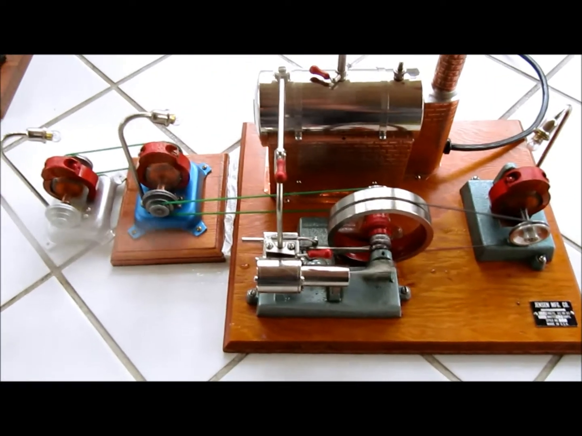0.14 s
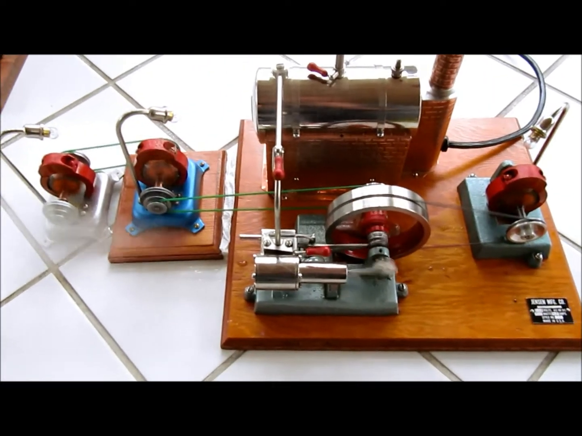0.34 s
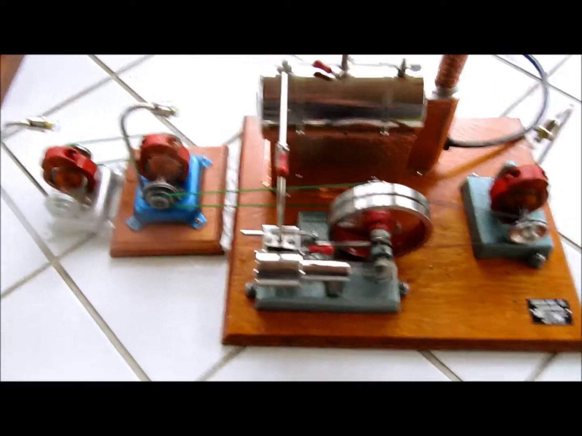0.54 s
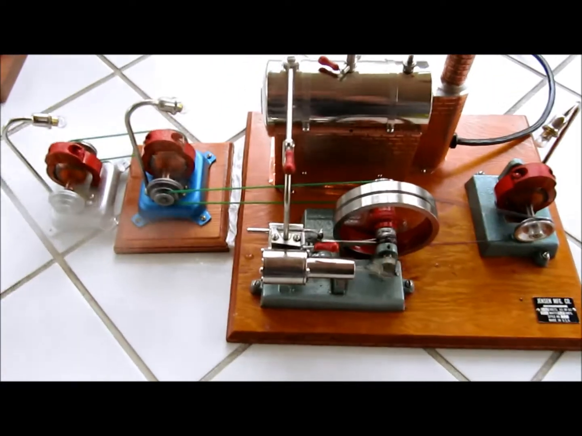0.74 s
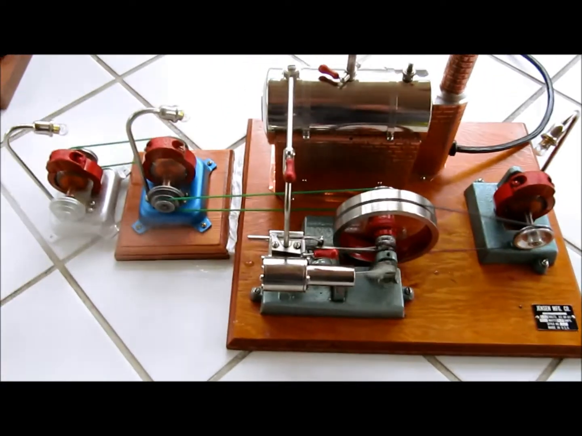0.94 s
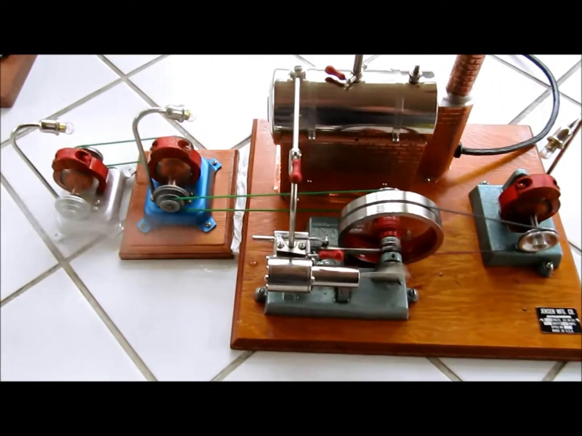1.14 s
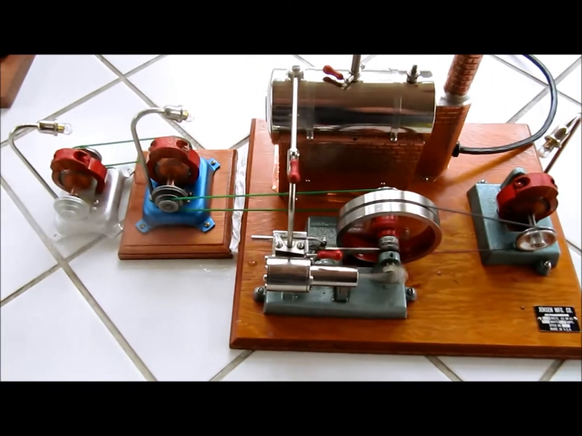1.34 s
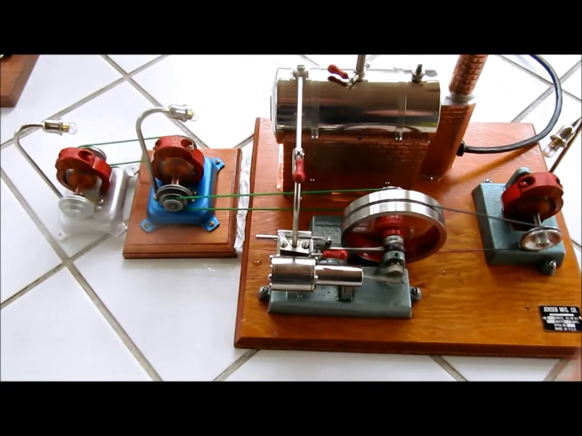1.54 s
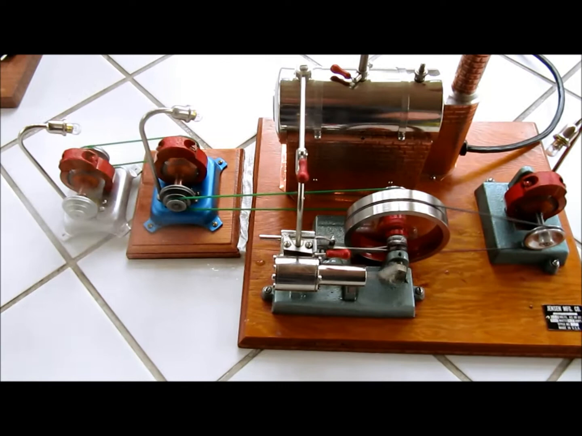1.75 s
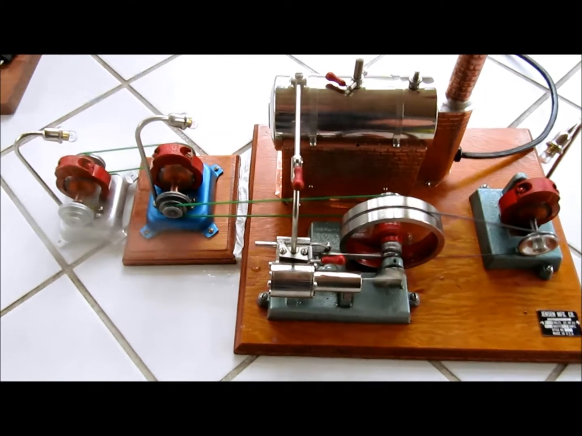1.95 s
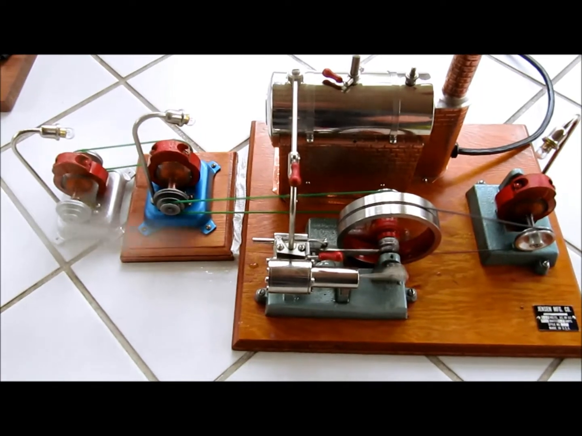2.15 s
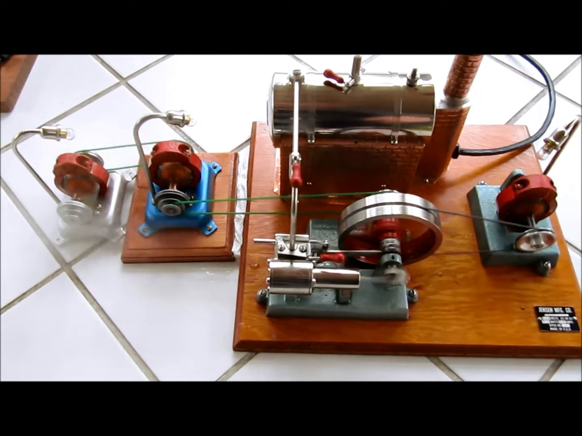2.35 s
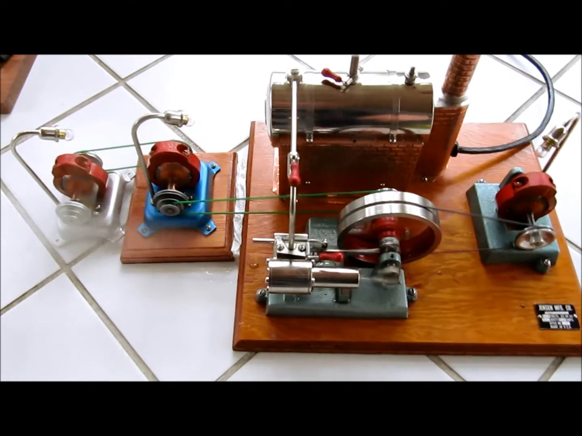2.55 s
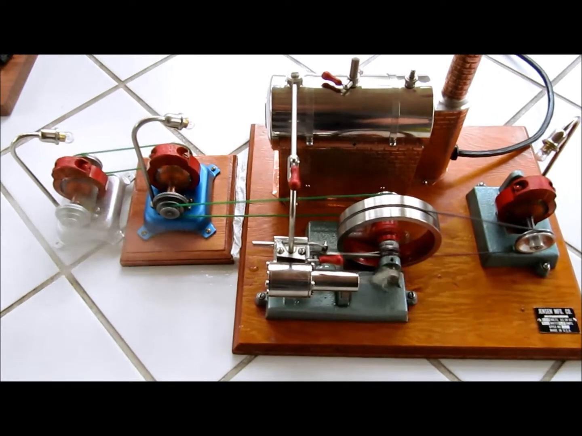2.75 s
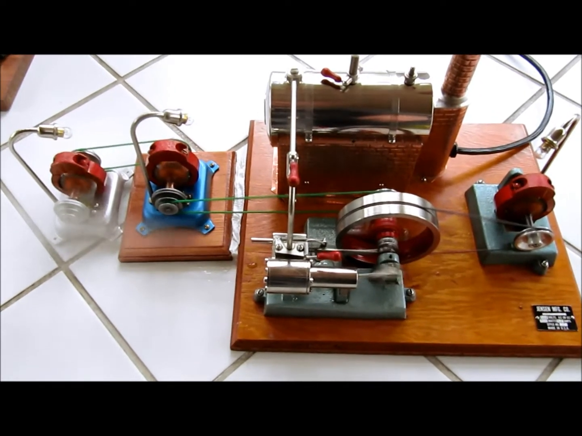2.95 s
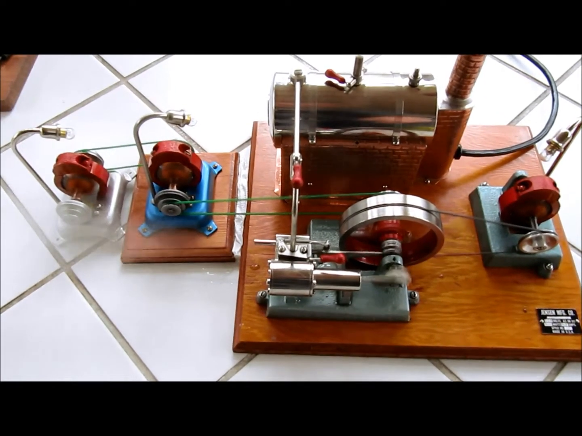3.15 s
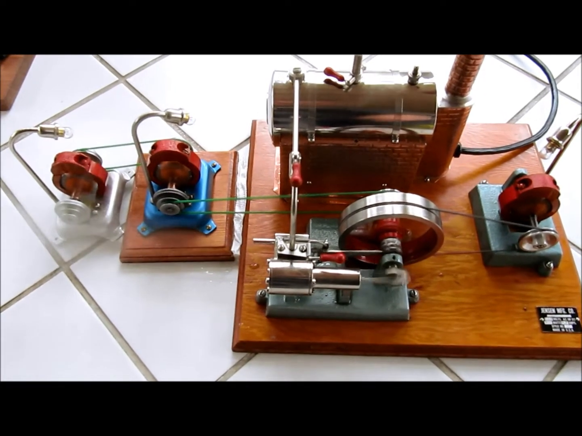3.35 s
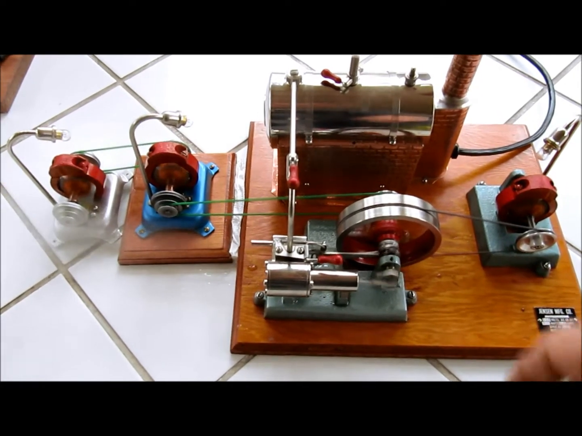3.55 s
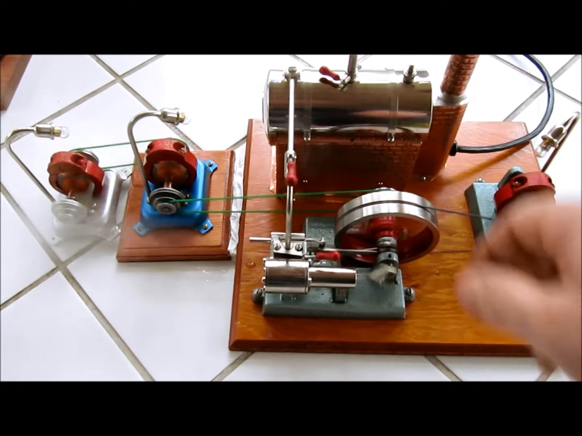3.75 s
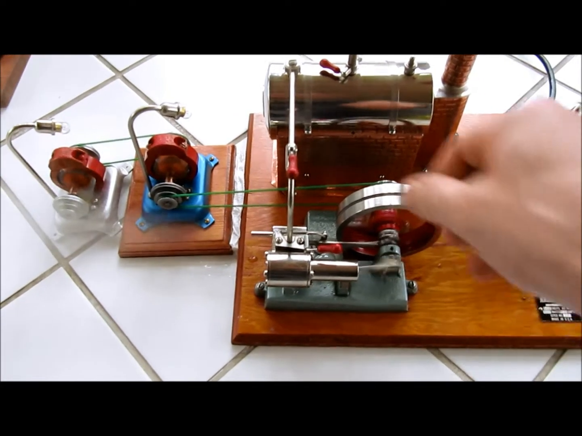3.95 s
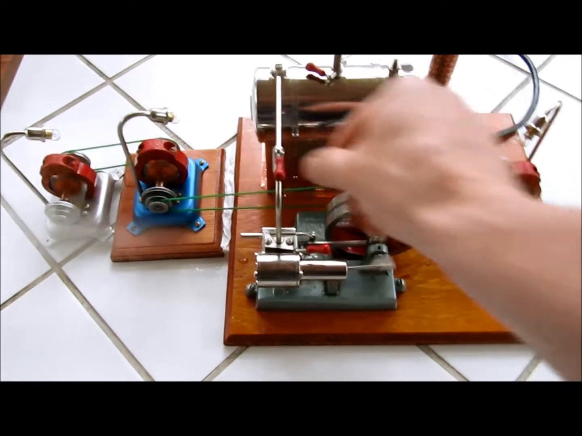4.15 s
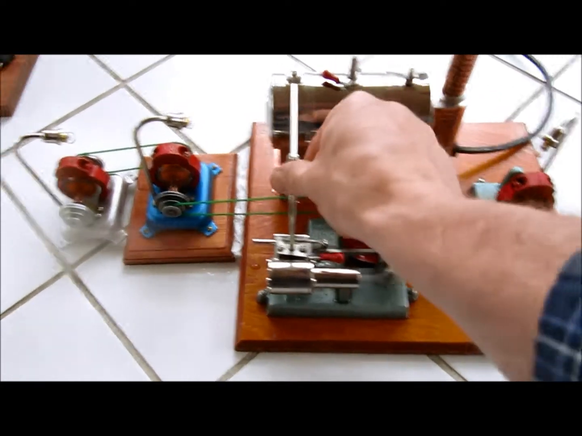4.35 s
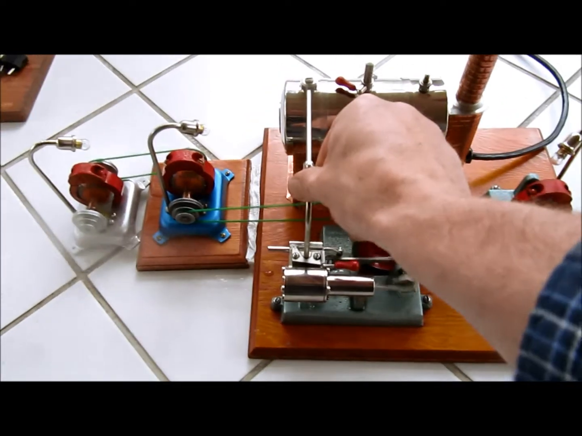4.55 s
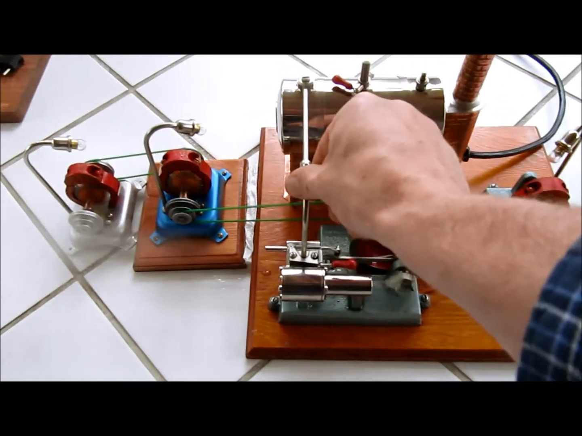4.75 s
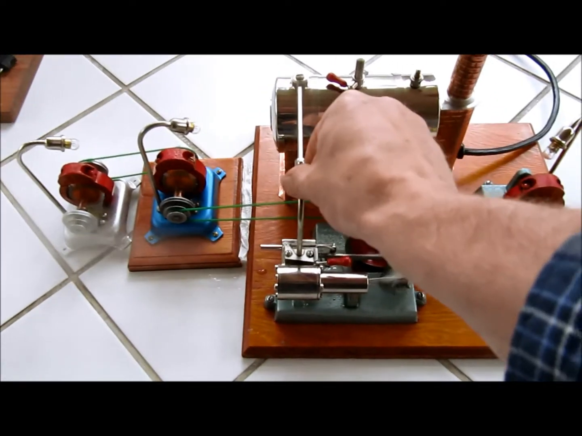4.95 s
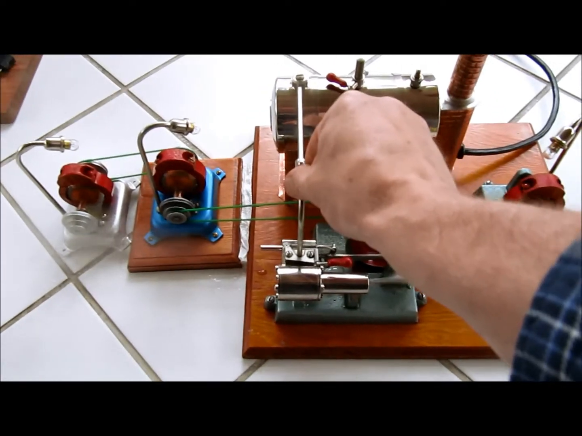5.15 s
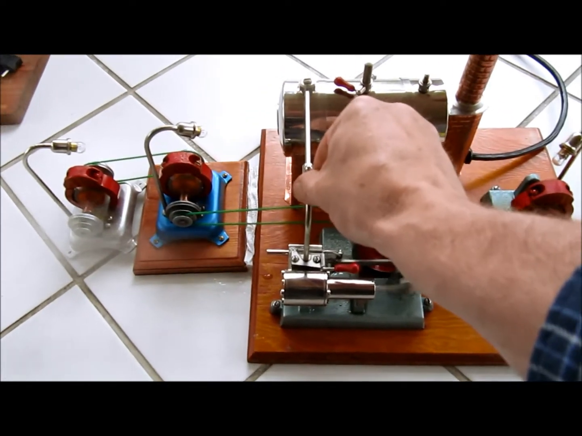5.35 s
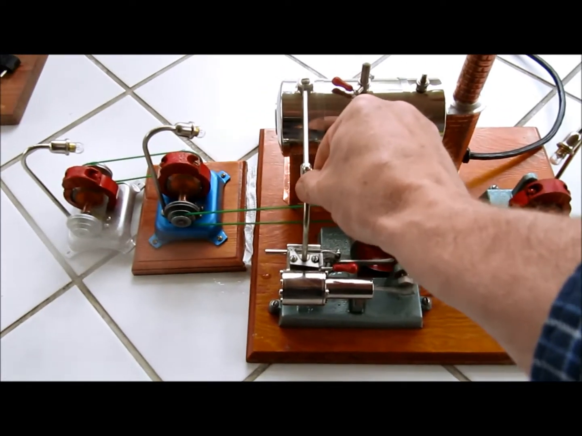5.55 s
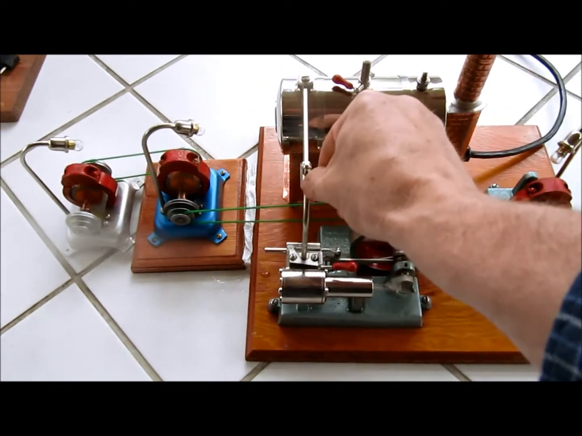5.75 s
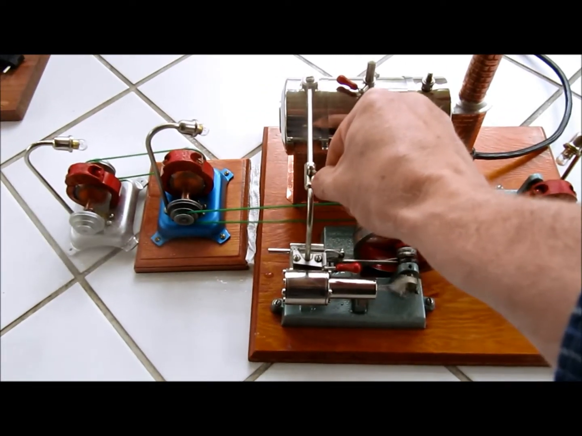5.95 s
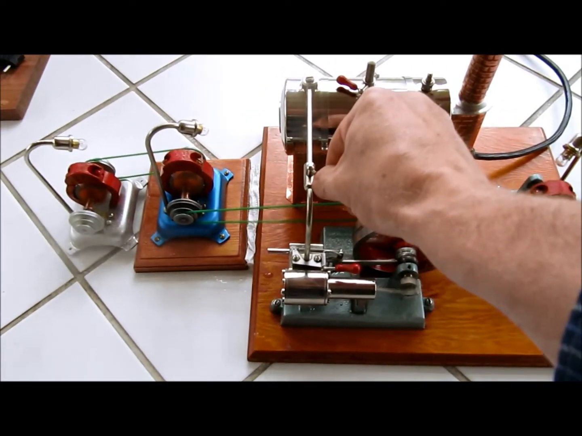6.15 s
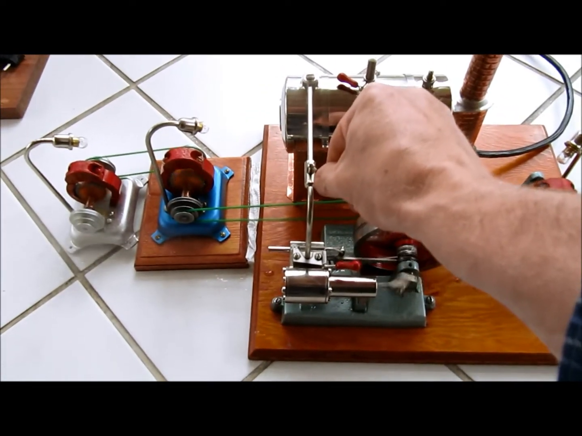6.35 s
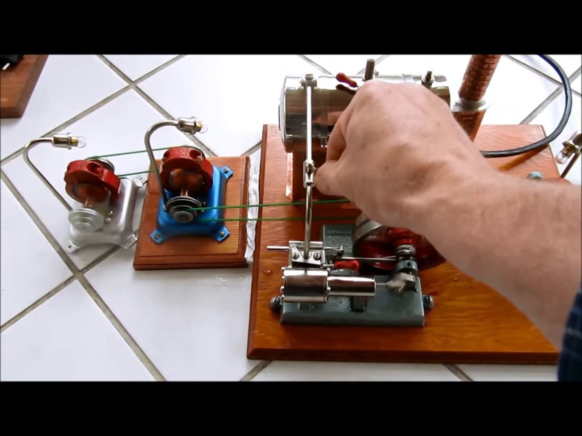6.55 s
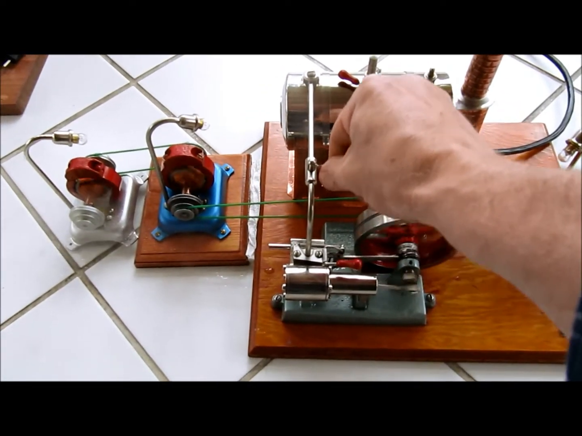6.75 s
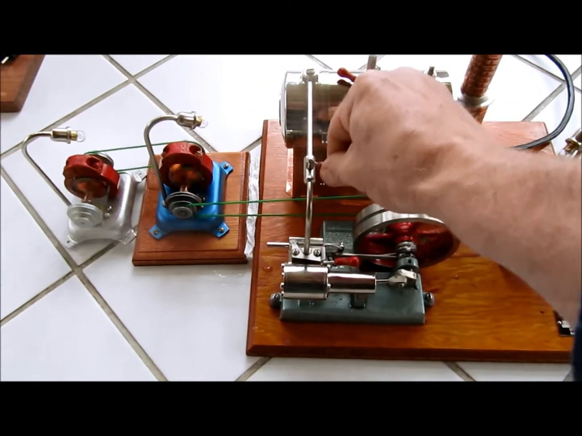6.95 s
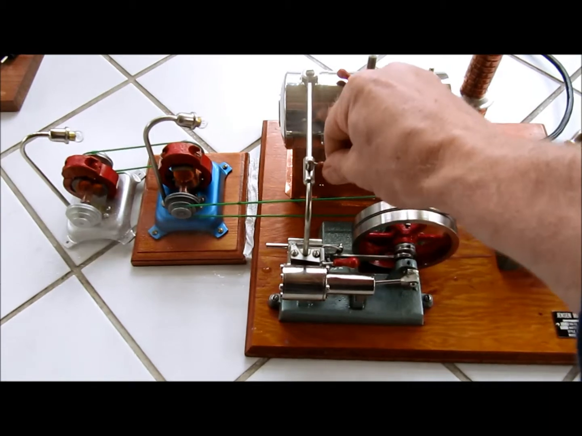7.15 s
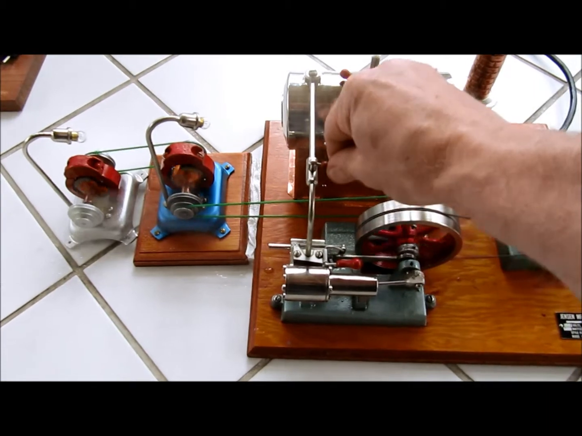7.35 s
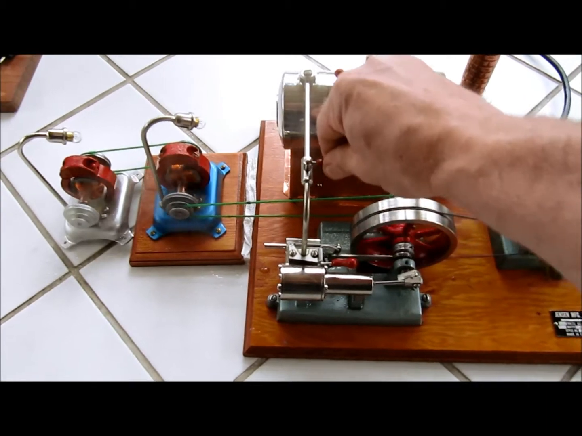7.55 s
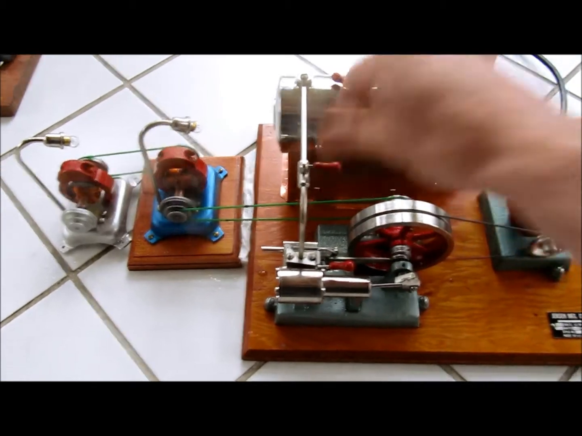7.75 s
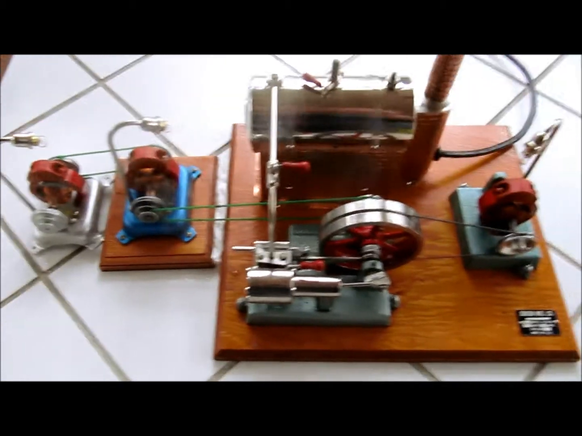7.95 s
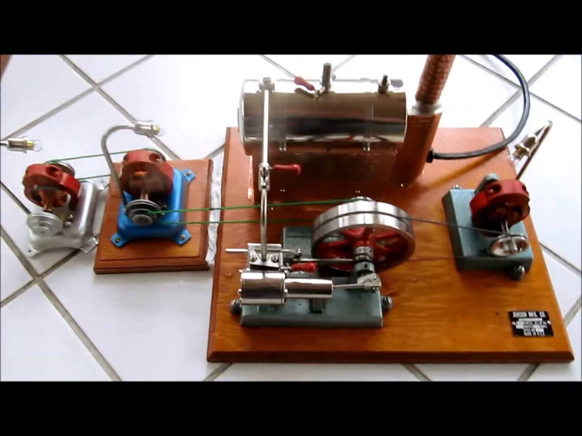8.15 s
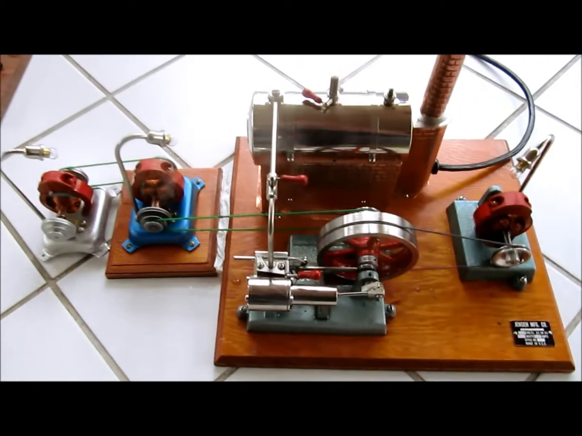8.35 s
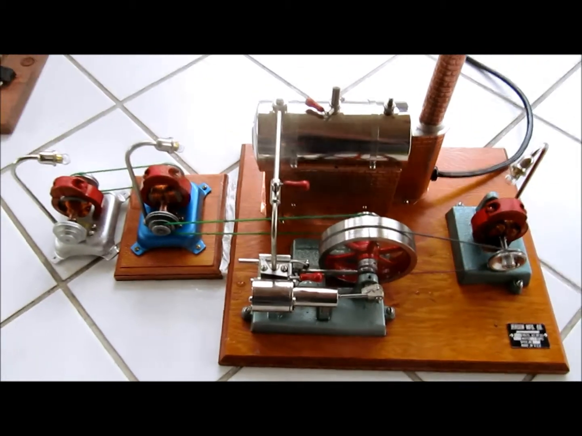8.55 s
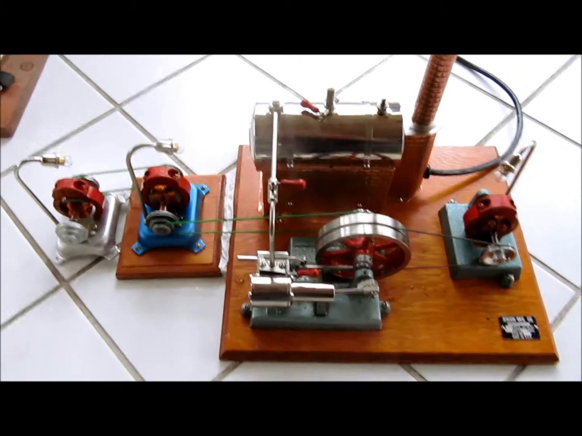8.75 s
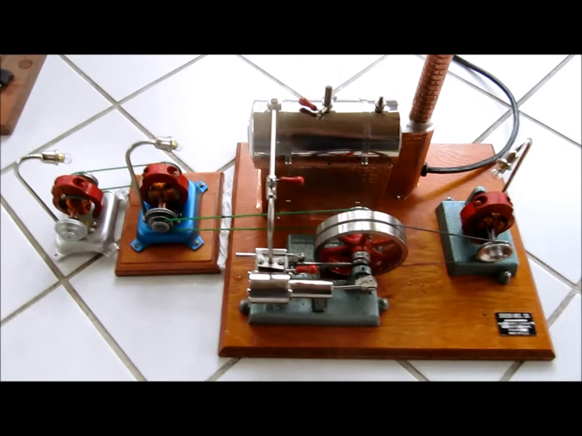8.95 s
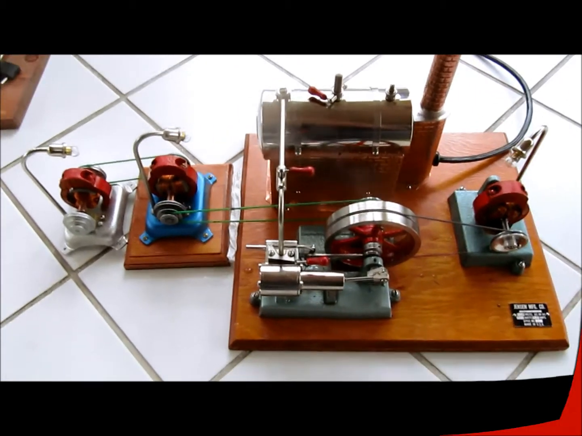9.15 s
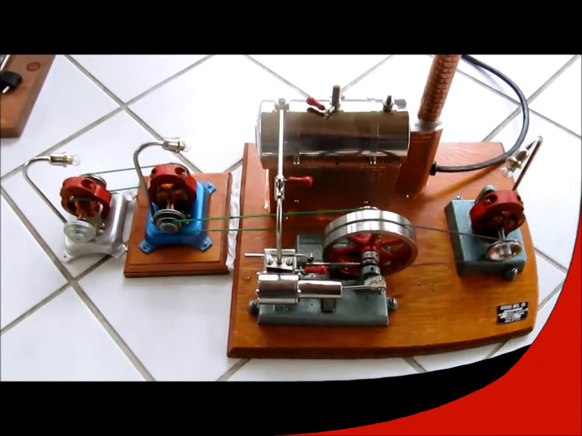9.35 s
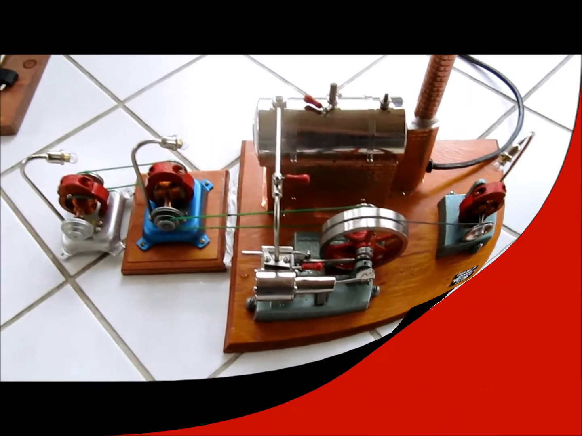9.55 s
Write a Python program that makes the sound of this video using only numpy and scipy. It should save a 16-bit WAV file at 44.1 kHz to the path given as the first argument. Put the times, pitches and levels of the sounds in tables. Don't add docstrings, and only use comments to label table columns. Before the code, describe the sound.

Close handheld pickup of a toy steam engine over a tiled floor: a rapid fluttering hiss, metallic and high, with dry knocking through its wooden base and whirring generators. A hand closing in makes the hiss slightly hollow. The valve shuts, puffs spread out and die, a small squeak and knock follow, then a thin steam seep with brief spurts, room noise, low bumps and loud camera-housing ticks.

```python
import sys
import numpy as np
from scipy import signal
from scipy.fft import rfft, irfft, next_fast_len
from scipy.io import wavfile
from scipy.ndimage import uniform_filter1d, map_coordinates

SR = 44100
rng = np.random.default_rng(int(sys.argv[2]) if len(sys.argv) > 2 else 0)


def dump(signal):
    limited = np.clip(np.atleast_2d(signal).T, -1, 1)
    pcm = np.round(limited * 32767).astype(np.int16)
    wavfile.write(sys.argv[1], SR, pcm)


def level_to_linear(level):
    exponent = np.asarray(level, float) / 20
    return 10 ** exponent


N = 427326
TIME_S = np.arange(N) / SR

STROKES = [(-.03, .31), (.44, .86)]
# shut/dB, peak/dB, after blow-down/dB, push-out end/dB
FRAME_JET = [(-10, -2.9, -0.5, -5), (-8.5, -2.5, -4, -7)]
FRAME_LAG = (0.084, 3.8, 0)
KICK_TURNS = 0.066
FULL_SPEED = 11
FRAME_DB = -37
HAND_START_S, HAND_THERE_S = 3.5, 4.3


def unit(x):
    return x / np.sqrt(np.mean(x ** 2) + 1e-20)


def curves(rows, at=None):
    s, *cols = np.transpose(rows)
    return [np.interp(TIME_S if at is None else at, s, c) for c in cols]


def ramp(start_s, end_s):
    return np.clip((TIME_S - start_s) / (end_s - start_s), 0, 1)


def wobble(rate_hz):
    coarse = np.arange(0, N + 8, 8)
    knots = rng.standard_normal(int(N * rate_hz / SR) + 4)
    return np.interp(np.arange(N), coarse, map_coordinates(knots, [coarse * rate_hz / SR]))


def filtered(x, response):
    m = next_fast_len(N + SR // 2)
    return irfft(rfft(x, m) * response(np.fft.rfftfreq(m, 1 / SR)), m)[:N]


def hiss(spectrum, patchy_db):
    z = signal.stft(rng.standard_normal(N + 512), nperseg=256)[2]
    field = uniform_filter1d(rng.standard_normal(z.shape), size=4, axis=0)
    field = uniform_filter1d(field, size=12, axis=1)
    patchy = signal.istft(z * level_to_linear(patchy_db * unit(field)), nperseg=256)[1][:N]
    f, db = np.transpose(spectrum)
    return unit(filtered(patchy, lambda hz: level_to_linear(np.interp(np.log(hz + 1), np.log(f + 1), db))))


def ring(hz, t60_s, t):
    return level_to_linear(-60 * t / t60_s) * np.sin(2 * np.pi * hz * t)


def crank_speed():
    # t/s, speed/(turns/s)
    speed_rows = [
        (0, 11.162),
        (3.5, 10.973),
        (5.72, 10.953),
        (5.95, 10.261),
        (6.55, 4.515),
        (7.1, .682),
        (7.4, 0),
    ]
    return curves(speed_rows)[0]


def port(turns, jet, lag):
    crack_turns, blow_turns, shut_turns = 0.031, 0.081, 0.072
    rise_turns, under_db, kick_db = lag
    knots = []
    for (opens, shuts), (shut, peak, blown, end), after in zip(STROKES, jet, jet[::-1]):
        peak_at = opens + rise_turns
        knots += [(opens, shut), (opens + crack_turns, peak - under_db), (peak_at, peak)]
        knots += [(peak_at + blow_turns, blown), (shuts - KICK_TURNS, end)]
        knots += [(shuts, end + kick_db), (shuts + shut_turns, after[0] + 2)]
    return np.interp(turns, *np.transpose(knots), period=1)


def vibration(level_db, slows):
    settle_db, settle_s, sag_db_per_s = 3, 0.31, 0.3553
    jolt_s, jolt_db, jolt_t60_s = 6.805, -47, 0.73
    steady_db = level_db + settle_db * np.exp(-TIME_S / settle_s) - sag_db_per_s * TIME_S
    steady = level_to_linear(steady_db) * (crank_speed() / FULL_SPEED) ** slows
    lurch_db = jolt_db + level_db - FRAME_DB + 4.5 - 60 * np.abs(TIME_S - jolt_s) / jolt_t60_s
    return np.hypot(steady, level_to_linear(lurch_db) * (TIME_S > jolt_s))


def echo(x, delay_ms):
    return map_coordinates(x, [np.arange(N) - delay_ms * SR / 1000])


def surroundings(x):
    # delay/ms, level/dB
    tiles = [
        (1.3, -11),
        (2.3, -12),
    ]
    hand_db, far_ms, near_ms = -10, .76, .58
    close = ramp(HAND_START_S, HAND_THERE_S)
    near = sum(level_to_linear(db) * echo(x, ms + 0.089 * wobble(0.816)) for ms, db in tiles)
    hand = level_to_linear(hand_db) * close * echo(x, far_ms + (near_ms - far_ms) * close)
    return level_to_linear(-1.0) * (x + near + hand)


def boiler_hiss(gain_db):
    # f/Hz, level/dB
    boiler = [(2500, -36), (4000, -43), (5500, -18.5), (7000, -9.5), (8500, -6.5), (9500, -3.5),
              (11000, -7), (12400, -11.5), (13000, -18), (15700, -22)]
    # t/s, length/s, level/dB
    spurt_rows = [
        (8.19, .02, -42),
        (9.045, .012, -52),
        (9.168, 0.095, -45),
        (9.587, 0.078, -36),
    ]
    boiler_db, supply_db, supply_ends_s, supply_db_per_s = -50, -44.5, 6, 27.5
    spurts = np.zeros(N)
    for s, length_s, db in spurt_rows:
        edges = np.minimum((TIME_S - s) / 0.0054, (s + length_s - TIME_S) / 0.014 + 1)
        spurts += level_to_linear(db) * np.clip(edges, 0, 1)
    supply = level_to_linear(supply_db - supply_db_per_s * np.maximum(TIME_S - supply_ends_s, 0))
    steady = np.hypot(level_to_linear(boiler_db + gain_db), supply)
    return np.hypot(steady * level_to_linear(.3 * wobble(12)), spurts) * hiss(boiler, patchy_db=.4)


def hand_rumble(lumpy):
    # f/Hz, level/dB
    rumble = [(8, -13), (20, -1), (50, -18), (75, -17), (100, -29), (200, -58)]
    # t/s, level/dB
    grip_rows = [(7.28, -59), (7.55, -69), (7.85, -53), (7.97, -57), (8.2, -54), (8.4, -60), (8.56, -50),
                 (8.69, -45), (8.92, -53), (9.05, -48), (9.14, -56), (9.2, -53), (9.28, -52), (9.46, -50.5),
                 (9.63, -58)]
    shaken_db, still_db, grip_rise_s = -62, -73, 0.038
    grips = np.zeros(N)
    for s, db in grip_rows:
        u = np.maximum(TIME_S - s, 0) / grip_rise_s + 1e-9
        grips += level_to_linear(db) * u * np.exp(1 - u)
    floor = level_to_linear(shaken_db) * (crank_speed() / FULL_SPEED) ** 2 + level_to_linear(still_db)
    return np.hypot(floor, grips) * level_to_linear(1.6 * lumpy * wobble(16)) * hiss(rumble, patchy_db=1.5)


def background():
    # t/s, gain/dB
    gain_rows = [(0, -15), (6, 5.5), (6.4, 2), (7, 1), (7.6, 1.5), (8.2, 5), (9, 6.5), (9.65, 10)]
    # f/Hz, level/dB
    room = [(53, -20), (90, -4), (430, -8), (461, -3), (531, -5), (781, -3), (1090, -6), (1470, -3.5),
            (2020, -6.5), (2200, -4.5), (2490, -5), (6000, -6), (7800, -13), (13200, -120)]
    room_db = -54
    gain_db = curves(gain_rows)[0]
    lumpy = ramp(6.7, 8.6)
    drive = hiss([(2050, -51), (2130, -5), (2180, -2), (2260, -49)], patchy_db=0.0)
    whine = level_to_linear(-13.0) * lumpy * drive
    air = level_to_linear(room_db + gain_db) * (hiss(room, patchy_db=1.35) + whine)
    return boiler_hiss(gain_db) + air + hand_rumble(lumpy)


def housing():
    # t/s, snap/dB, ring f/Hz, ring/dB, thud/dB
    ticks = [(6.455, -31, 2260, -35, -57), (6.6603, -33, 2290, -38, -38), (6.8036, -27, 2220, -33, -29.5),
             (8.578, -18, 2160, -27, -39), (8.5898, -8, 2580, -43, -24.5), (8.683, -30, 2380, -26, -50),
             (8.6894, -7.5, 4060, -16, -33), (9.0632, -17, 4560, -20, -28), (9.065, -29, 2240, -20.5, -51),
             (9.2198, -36, 3020, -45, -42), (9.239, -28, 2230, -33, -55), (9.377, -16, 1140, -26, -17.5),
             (9.507, -24, 4450, -36, -50), (9.671, -18.5, 895, -29, -40)]
    # f/Hz, level/dB
    snap_modes = [(1000, -11), (1600, -9), (2500, 5), (3500, 4.5), (4400, 7), (5400, -3), (6500, -4),
                  (8000, -6), (9700, 3)]
    snap_t60_s, crack_db, crack_t60_s = 0.0084, -13, .012
    shell_hz, shell_db, shell_t60_s = 410, -7, 0.0092
    out, t = np.zeros(N + SR), np.arange(SR // 10) / SR
    give = 1 - np.exp(-t / .0005)
    for s, db, hz, ring_db, thud_db in ticks:
        snap = np.zeros(len(t))
        for k, (f, level_db) in enumerate(snap_modes):
            level = level_to_linear(level_db + rng.normal(0, 1.5))
            snap += (-1) ** k * level * ring(f * (1 + rng.normal(0, .05)), snap_t60_s * (3500 / f) ** .5, t)
        snap *= give
        grit = 4 * np.gradient(uniform_filter1d(rng.standard_normal(len(t)), size=4))
        snap = snap + np.abs(snap).max() * level_to_linear(crack_db - 60 * t / crack_t60_s) * grit * give
        snap = unit(snap)
        tail = level_to_linear(ring_db) * ring(hz, 0.014, t) * give
        thud = level_to_linear(thud_db) * ring(650, .012, t) * (1 - np.exp(-t / .0009))
        shell = level_to_linear(thud_db + shell_db) * ring(shell_hz, shell_t60_s, t)
        out[round(s * SR):][:len(t)] += level_to_linear(db) * snap / np.abs(snap).max() + tail + thud + shell
    start_s, end_s, drag_db = 9.043, 9.063, -48
    drag = level_to_linear(drag_db) * ramp(start_s, start_s + .004) * (1 - ramp(end_s, end_s + .006))
    return out[:N] + drag * hiss([(3200, -28), (3900, -3), (5000, 0), (5800, -30)], patchy_db=-1)


def spindle_leak():
    start_s, end_s, level_db = 6.79, 7.3, -49
    dip_s, dip_half_s, dip_db = 7.04, .05, 5
    falter_db = dip_db * np.exp(-((TIME_S - dip_s) / dip_half_s) ** 2)
    gate = ramp(start_s, start_s + .05) * (1 - ramp(end_s - .05, end_s + .01))
    whistle = hiss([(4300, -30), (5150, -2), (5600, 0), (6300, -2), (6900, -40)], patchy_db=1.3)
    return gate * level_to_linear(level_db - falter_db + 1.5 * wobble(25)) * whistle


def lever():
    # t/s, peak/dB, t60/s
    tap = [
        (7.745, -34.5, 0.38),
    ]
    # f/Hz, level/dB
    tap_modes = [(195, -3), (480, 4.5), (1020, 4)]
    start_s, rises_s, end_s, level_db = 7.17, 7.38, 7.72, -61.5
    squeak_hz, squeak_hz_per_s = 466, 1050
    hz = squeak_hz + squeak_hz_per_s * (end_s - rises_s) * ramp(rises_s, end_s) + 50 * wobble(90)
    gate = ramp(start_s, start_s + .05) * (1 - ramp(end_s - .04, end_s))
    squeak = gate * level_to_linear(level_db + 3 * wobble(30)) * np.sin(2 * np.pi * np.cumsum(hz) / SR)
    out, t = np.zeros(N + SR), np.arange(SR // 4) / SR
    for s, db, t60_s in tap:
        modes = sum(level_to_linear(mode_db) * ring(f, t60_s * 300 / (f + 100), t) for f, mode_db in tap_modes)
        out[round(s * SR):][:len(t)] += level_to_linear(db - 15.5) * modes
    return out[:N] + squeak


def bearing_knocks(turns):
    # angle/turns, level/dB
    knock_rows = [(.155, 12), (0.279, -1.5), (0.369, 0), (.58, 5.5), (.775, 7), (.8, 4.5), (0.841, 2.5)]
    # f/Hz, width/Hz, level/dB
    board = [(158.7, 48, -3.5), (263, 80, -9.5), (412, 48, -8), (465.2, 22, 2.5), (612, 106, -2),
             (962, 24, 2), (1134, 86, 3.5), (1500, 410, -9.5)]
    blows = np.zeros(N)
    for angle, db in knock_rows:
        at = np.flatnonzero(np.diff(np.floor(turns - angle)))
        chance = rng.standard_normal((100, 2))[:len(at)]
        late = np.abs(7 * chance[:, 0]).astype(int)
        blows[at + late] += level_to_linear(db + 2.1 * chance[:, 1])

    def wood(f):
        total = 0
        for k, (c, w, db) in enumerate(board):
            total = total + (-1) ** k * level_to_linear(db) * 1j * f * w / (c * c - f * f + 1j * f * w)
        return total

    return unit(filtered(blows, wood))


def generator_hum(turns):
    # f/Hz, level/dB
    hum_rows = [(154, -62), (232, -65), (264, -61.5), (388, -60.5), (465, -68), (490, -72)]
    # multiple of crank speed, level/dB
    shake = [(2, -76), (3, -89), (4, -74), (6, -68.5), (9, -84), (11, -70.5), (12, -75), (16, -65)]
    hum = np.zeros(N)
    for hz, db in hum_rows:
        hum += level_to_linear(db + 1.2 * wobble(4.72)) * np.sin(2 * np.pi * hz * TIME_S + .5 * wobble(11))
    for k, db in shake:
        hum += level_to_linear(db + 1.8 * wobble(3.4)) * np.sin(2 * np.pi * k * turns)
    return hum * np.clip((np.gradient(turns) * SR - 9.5) / 0.65, 0, 1)


def machinery(turns):
    # f/Hz, level/dB
    whirr_spectrum = [(60, -40), (100, -15), (150, -7.5), (205, -11.5), (300, -3.5), (430, -13), (470, -6),
                      (520, -12), (600, -3.5), (880, -7.5), (1130, -3.5), (1310, -9.5), (1700, -13),
                      (2300, -38)]
    # t/s, level/dB
    coasting_rows = [(5.9, -65), (6.1, -66), (6.55, -60), (6.7, -69)]
    whirr_db, whirr_slows = -46.5, 1.26
    bearings = hiss([(950, -40), (1070, -7), (1130, -8), (1250, -36)], patchy_db=-2.0)
    coasting = level_to_linear(curves(coasting_rows)[0]) * bearings
    pulse_db = -3.0 + 0.24 * port(turns, FRAME_JET, FRAME_LAG) + 2.5
    whirr = level_to_linear(pulse_db) * hiss(whirr_spectrum, patchy_db=1.5)
    shaken = vibration(whirr_db, whirr_slows) * (level_to_linear(-5.0) * bearing_knocks(turns) + whirr)
    return shaken + generator_hum(turns) + coasting


def rundown_puffs():
    puff_rows = [(5.79, -18.5), (5.884, -27), (5.93, -18), (5.982, -18.5), (6.03, -20), (6.085, -18.5),
                 (6.139, -23), (6.205, -20), (6.266, -20.5), (6.346, -23), (6.421, -21.5), (6.522, -22.5),
                 (6.627, -21.5), (6.786, -20.5), (7.004, -27.5)]
    rise_at_full_s, slows = 0.005, 0.83
    speed = crank_speed()
    puffs, t = np.zeros(N), np.arange(SR // 5) / SR
    for s, db in puff_rows:
        rise_s = rise_at_full_s * (FULL_SPEED / speed[round(s * SR)]) ** slows
        puffs[round((s - rise_s) * SR):][:len(t)] += level_to_linear(db) * (t / rise_s * np.exp(1 - t / rise_s)) ** 3.8
    return puffs


def shaken_frame(frame_db, puffs, stroke, spit):
    # f/Hz, level/dB
    frame_spectrum = [(880, -36), (1500, -9), (1640, -13.5), (1730, -5), (2090, -2.5), (2260, 1),
                      (2590, -1), (2930, -4.5), (3280, 0), (4000, -4), (5190, -2.5), (5640, -8),
                      (6200, -11.5), (8060, -13), (13600, -120)]
    kick_db, rattle_db, rattle_s = -24.5, -37.5, .6
    shaking = vibration(FRAME_DB, 1)
    slow = ramp(6.05, 6.25)
    pulsed = unit(level_to_linear(1.38 * frame_db + 0.4 * stroke[0] + .3 * spit) * hiss(frame_spectrum, patchy_db=0.6))
    bed = 0.63 * shaking + level_to_linear(kick_db) * np.roll(puffs, 300)
    frame = (1 - slow) * shaking * pulsed + slow * bed * hiss(frame_spectrum, patchy_db=3.5)
    plate_hiss = hiss([(2900, -34), (3250, 2), (3700, -7), (4100, -14)], patchy_db=0)
    plate = unit(level_to_linear(1.2 * frame_db) * plate_hiss)
    return frame + level_to_linear(rattle_db) * np.exp(-TIME_S / rattle_s) * plate


def cupped_hand(frame_db):
    cavity = hiss([(3800, -36), (4500, -1.5), (5000, -5), (5400, -0.5), (5900, -31)], patchy_db=1)
    hollow = unit(level_to_linear(2.9 * frame_db) * cavity)
    return hollow * level_to_linear(-42.5) * ramp(HAND_START_S, HAND_THERE_S) ** 2 * (crank_speed() / FULL_SPEED) ** 13.0


def exhaust(turns):
    # t/s, exhaust level/dB
    steam = [(0, -16), (5.95, -16), (6.1, -23), (6.38, -28), (6.56, -33.5), (6.9, -39), (7.07, -41),
             (7.15, -68)]
    # t/s, level/dB
    aim = [(0, 0), (.5, .5), (1, -2), (2, 0), (3.5, 0), (4, -2), (4.5, 1), (5.4, 2), (5.8, 0.5)]
    # f/Hz, level/dB
    pipe_spectrum = [(4500, -53), (5700, -21), (6200, -18), (6700, -10), (7050, -6), (7400, -0.5),
                     (7750, -1.5), (8100, -4), (8400, -9), (8900, -5.5), (9300, -11.5), (9900, -46),
                     (11000, -58)]
    # f/Hz, level/dB
    nozzle_spectrum = [(8000, -53), (9000, -22), (9600, -3.5), (10000, -1.5), (10450, -7), (10900, 1),
                       (11350, 2), (11900, -2), (12250, -2.5), (12900, -12), (13700, -20), (14400, -7.5),
                       (15500, -25.5), (16200, -40)]
    # shut/dB, peak/dB, after blow-down/dB, push-out end/dB
    pipe_jet = [
        (-21, -4, -3.5, -9),
        (-18.5, -1.5, -6.5, -11),
    ]
    nozzle_jet = [
        (-23, 0.26, -5, -6.5),
        (-19.5, -1.1, -7, -16.5),
    ]
    pipe_lag, nozzle_lag = (0.1, 2.2, 3.7), (0.068, 11, 2.4)
    steep, steep_per_s, nozzle_fades, squeeze_db = 0.97, 0.048, 0.47, 6
    steam_db = curves(steam)[0]
    depth = steep + steep_per_s * TIME_S
    share_db = curves(aim)[0] + nozzle_fades * (steam_db - steam[0][1])
    pipe_db = port(turns, pipe_jet, pipe_lag)
    nozzle_db = port(turns, nozzle_jet, nozzle_lag)
    frame_db = port(turns, FRAME_JET, FRAME_LAG)
    squeeze = np.exp(-((turns % 1 - STROKES[0][1]) / KICK_TURNS * 2) ** 2)
    pipe_db = pipe_db + squeeze_db * ramp(5.9, 6.1) * squeeze
    stroke = rng.standard_normal((200, 2))[(2 * turns + .15).astype(int)].T
    spit = 1.5 * wobble(700) + 0.8 * wobble(130)
    puffs = rundown_puffs()

    def flow(db):
        return np.hypot(level_to_linear(steam_db + depth * db), puffs)

    pipe = level_to_linear(-2.5 + .4 * stroke[0]) * flow(pipe_db) * hiss(pipe_spectrum, patchy_db=.6)
    nozzle_gain = level_to_linear(-1.5 + share_db + .3 * stroke[0] + .3 * stroke[1])
    nozzle = nozzle_gain * flow(nozzle_db) * hiss(nozzle_spectrum, patchy_db=.6)
    jet = surroundings(level_to_linear(spit) * (pipe + nozzle))
    return jet + shaken_frame(frame_db, puffs, stroke, spit) + cupped_hand(frame_db)


def scene():
    start_turn = .225
    turns = start_turn + np.cumsum(crank_speed()) / SR
    mix = background() + housing() + spindle_leak() + lever() + machinery(turns) + exhaust(turns)
    return mix[None]


def roll_off(x):
    return signal.sosfilt(signal.butter(12, 16810, fs=SR, output="sos"), x)


def record(dry):
    top_hz = 15850
    mix = filtered(dry[0], lambda hz: hz < top_hz)[None]
    return roll_off(mix)


dry = scene()
out = record(dry)
dump(out)
```